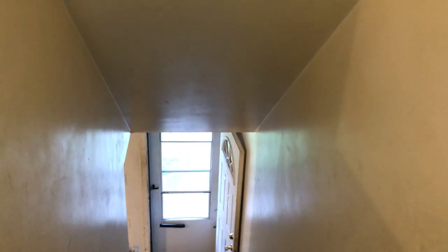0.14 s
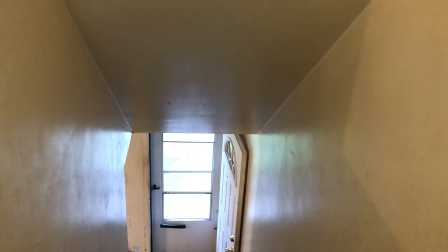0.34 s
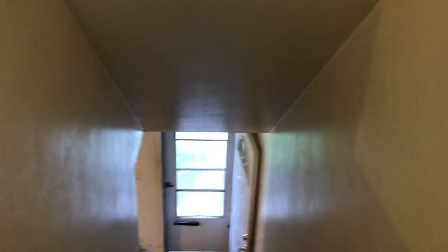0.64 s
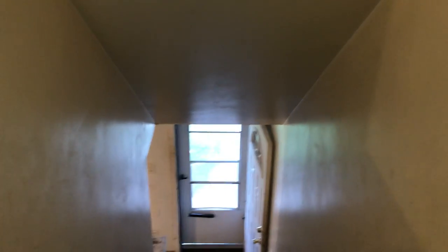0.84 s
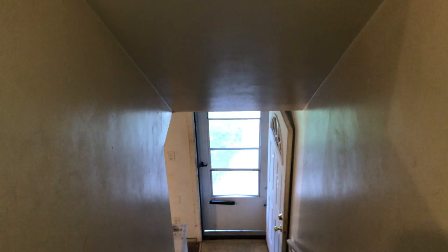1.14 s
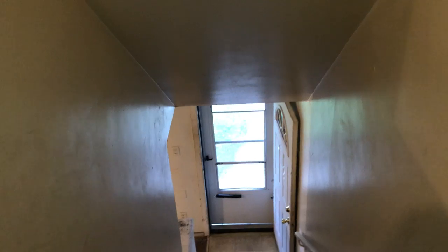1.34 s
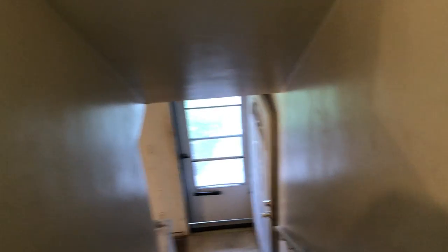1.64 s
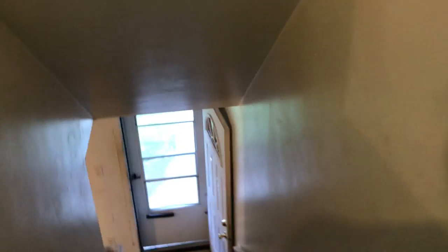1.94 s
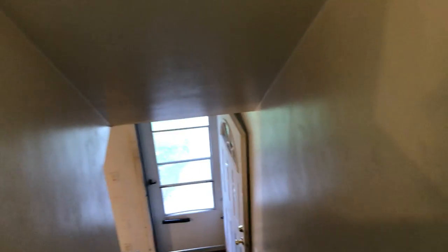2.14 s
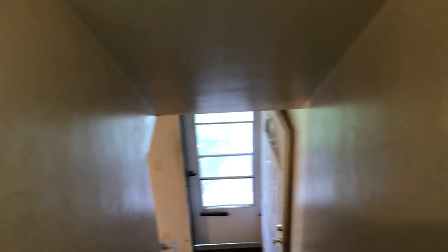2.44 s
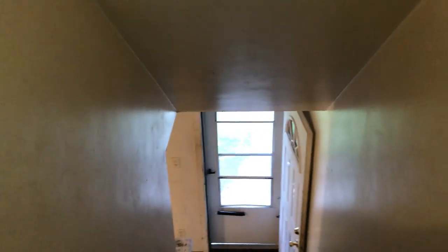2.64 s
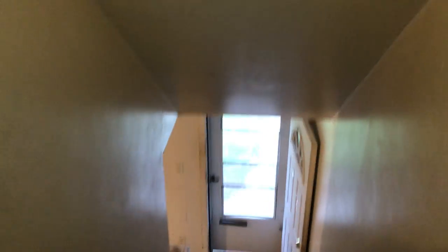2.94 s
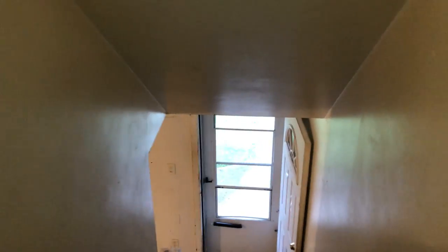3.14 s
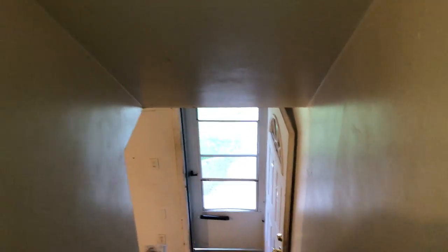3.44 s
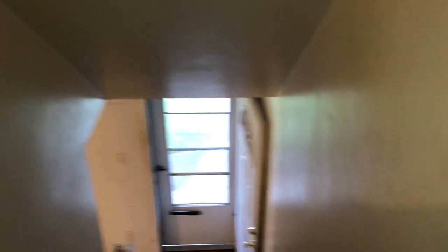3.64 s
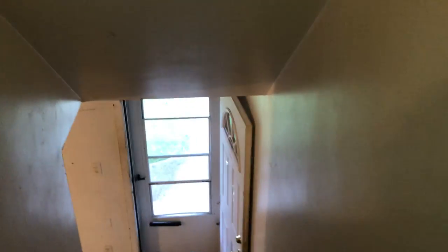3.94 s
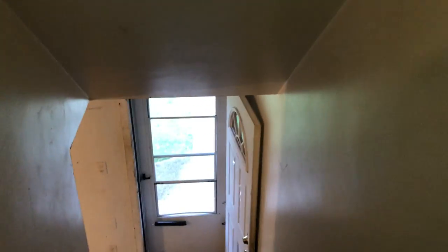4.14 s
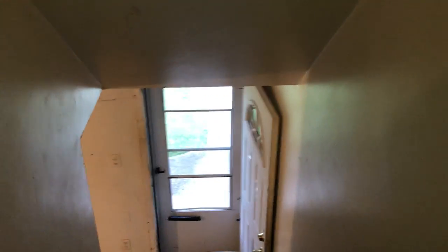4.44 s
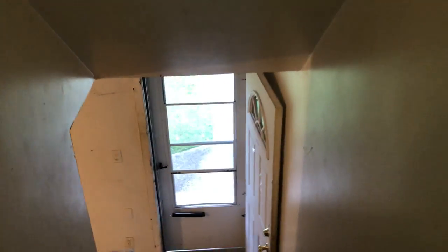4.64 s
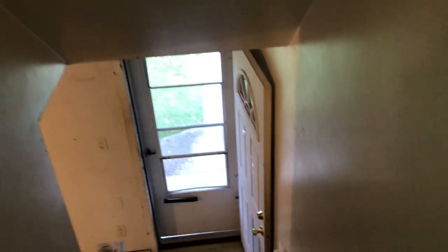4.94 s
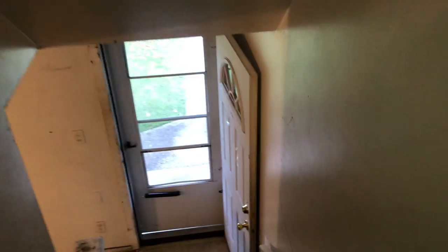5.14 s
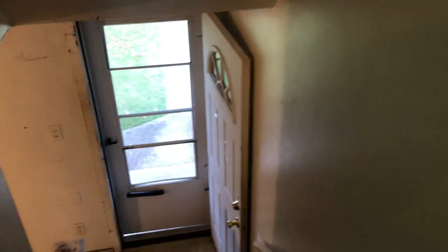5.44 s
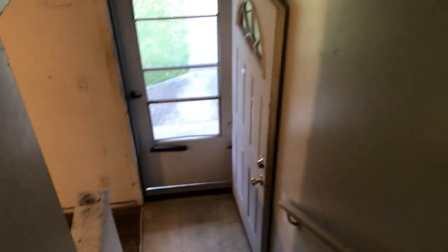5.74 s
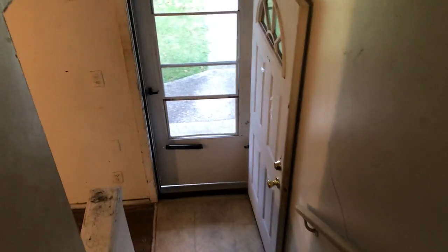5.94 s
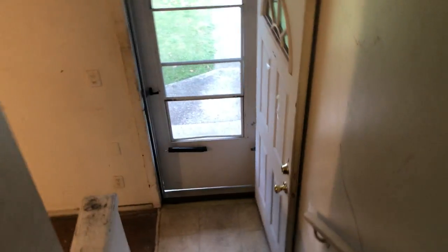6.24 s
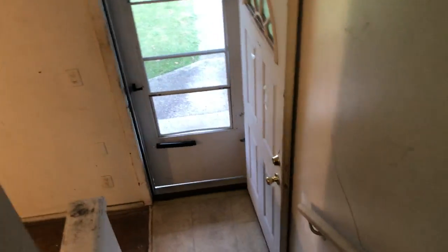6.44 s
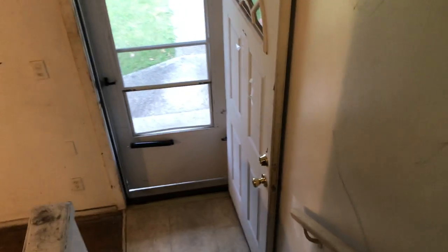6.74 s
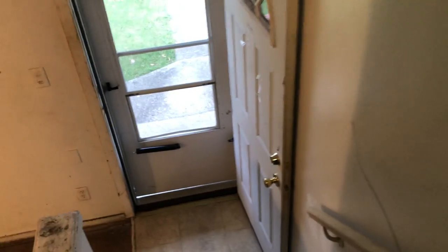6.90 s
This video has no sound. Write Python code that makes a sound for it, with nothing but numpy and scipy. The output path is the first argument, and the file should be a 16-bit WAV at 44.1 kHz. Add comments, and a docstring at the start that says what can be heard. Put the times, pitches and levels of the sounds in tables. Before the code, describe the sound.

Close handheld pickup of slow steps on old stairs indoors: first a little wood tick, then strained creaking that ends in a loud snap. Dull, carpet-softened heel thumps and woody cracks come irregularly, with low frame rumble. Later, skin hisses along a handrail in two or three swells, and a crisp bright click sounds near the microphone. Faint wavering hum underneath; small, dry room with a brief tail.

```python
"""In a bare, narrow stairwell, someone walks slowly down carpeted wooden stairs, holding a phone.
Heels thud as damped low sines; treads slipping on their nails crack as sets of decaying modes.
Loaded wood creaks as filtered showers of tiny slips, and the frame sways as low-band noise.
A hand on the rail hisses as coloured noise; crisp ticks close by are treble bursts with a little tail.
Faint house noise and two wavering drones lie beneath; hard walls return a short, dense tail."""
import sys
import numpy as np
from scipy import signal
from scipy.fft import rfft, irfft
from scipy.io import wavfile
from scipy.ndimage import uniform_filter1d

SR = 44100
rng = np.random.default_rng(int(sys.argv[2]) if len(sys.argv) > 2 else 0)


def generate_wav(signal):
    """Clip the signal to [-1, 1] and save it as 16-bit WAV at the path in sys.argv[1]."""
    frames = np.transpose(np.atleast_2d(signal))
    scaled = np.clip(frames, -1, 1) * 32767
    pcm = np.round(scaled).astype(np.int16)
    wavfile.write(sys.argv[1], SR, pcm)


N = 311762

# Spectrum of the house noise, relative: [f/Hz, level/dB]
HOUSE_SPECTRUM = [(15, -52), (25, -65), (63, 1.5), (113, 6), (144, 3.5), (189, -18.5), (241, -7.5),
                  (291, -12), (402, -18.5), (555, -13.5), (831, -25), (1460, -27), (2190, -59), (3970, -43),
                  (15700, -99)]
HOUSE_DB = -54  # rms about which the level wanders
# Narrow resonances of the low drone: [f/Hz, width/Hz, relative level/dB]
LOW_DRONE_MODES = [(84.7, 25, 0.5), (120.8, 13.2, 4.5)]
# Pitch of the steadier upper drone, which sinks once: [t/s, f/Hz]
UPPER_DRONE_PITCH = [(0, 293.3), (5.9, 293), (6.1, 270), (6.6, 270), (6.75, 293), (7.07, 293)]
# Drone levels: [t/s, low drone level/dB, upper drone level/dB]
DRONE_LEVELS = [(0.0, -60, -62.5), (1.3, -58.5, -64), (1.99, -47.5, -60), (2.15, -50, -75),
                (3.33, -49.5, -74), (3.8, -41, -58), (4.09, -47, -65), (4.55, -48.5, -67),
                (4.78, -51.5, -69), (4.92, -52, -73), (5.12, -54, -87), (5.42, -46, -73), (5.59, -54, -78),
                (5.83, -60, -77), (6.18, -46, -51.5), (6.48, -58.5, -72), (6.77, -45.5, -59),
                (7.07, -50, -68.5)]

# Reverberation: time to fall 60 dB, tail level, corner of its dulling low-pass
WELL_T60_S, WELL_DB, WELL_HZ = 0.17, -13.5, 2150

# Hand on the rail: [t/s, hiss level/dB, duller drag level/dB, top band level/dB]
HAND_LEVELS = [(0.0, -72.5, -66, -78), (0.14, -75, -72, -82), (0.94, -76.5, -73, -82),
               (1.71, -73.5, -70.5, -82), (1.93, -67.5, -63, -78), (2.2, -72.5, -71, -79),
               (2.95, -73.5, -65, -82), (3.09, -74, -60, -80), (3.33, -75.5, -68, -81),
               (3.52, -74.5, -70, -83), (3.76, -67, -63, -73), (4.0, -62, -62.5, -66),
               (4.29, -58, -58, -63), (4.53, -57.5, -58.5, -65), (4.69, -58.5, -56.5, -65),
               (4.78, -75, -64, -79), (5.0, -75, -67.5, -82), (5.28, -71, -63.5, -74),
               (5.42, -63, -60.5, -69), (5.81, -57.5, -57, -66), (6.06, -55.5, -55, -67),
               (6.24, -69.5, -61, -77), (6.52, -73.5, -75, -81), (6.73, -68.5, -62.5, -74),
               (6.87, -66.5, -62.5, -73), (7.07, -61.5, -56, -71)]
# Spectrum of the rubbing, relative: [f/Hz, level/dB per Hz]
RUB_SPECTRUM = [(300, -9), (600, 2.5), (900, -8), (1200, -3.5), (1590, 1.5), (3030, -5.5), (3330, -6),
                (4140, -7), (4970, -11), (5960, -8.5), (7640, -10), (14700, -6), (15700, -12)]

# Crisp ticks and brushes close by, with a little of the stairwell's tail:
# [t/s, peak level/dB, decay length/s, top band level/dB re peak, lower band edge f/Hz]
CLOSE_TICKS = [(0.466, -59.5, 0.014, -9, 5500), (0.504, -53, 0.012, -7, 3000),
               (0.725, -57, 0.0031, -9, 2500), (0.879, -45, 0.005, -25, 850), (1.728, -55, 0.011, -9, 3500),
               (1.796, -57, 0.0072, -15, 3000), (1.819, -36.5, 0.0066, -10, 3440),
               (1.834, -35, 0.0046, -10, 3660), (1.963, -36.5, 0.0064, -2.5, 4000),
               (2.603, -49.5, 0.02, 2, 3000), (2.616, -56, 0.06, -5, 3000), (2.706, -51, 0.004, -14, 1100),
               (2.909, -52, 0.019, -4, 2000), (2.92, -61, 0.2, 3, 6000), (2.991, -55, 0.051, -12, 2500),
               (3.51, -60, 0.0027, -18, 3700), (3.633, -70, 0.0037, -15, 3700),
               (3.747, -59, 0.008, 4, 5000), (4.308, -46.5, 0.072, -12, 7950),
               (5.229, -56.5, 0.01, -4, 3980), (5.265, -60, 0.0066, -10, 3700),
               (6.219, -37, 0.0029, -3, 5040), (6.23, -26.5, 0.0024, -7, 4030),
               (6.617, -52, 0.01, -13, 2800), (6.682, -56, 0.0027, -2, 3700)]

# Weight shifting onto a tread: [t/s, hold time/s, creak level/dB, frame sway level/dB]
TREAD_LOADS = [(0, 0.068, -62, -61.5), (.49, 0.049, -47, -67), (.9, 0.051, -79.5, -59),
               (1.12, 0.17, -56, -58), (1.4, 0.21, -55, -73), (1.73, 0.065, -47, -41),
               (1.84, 0.16, -45, -59), (2.14, 0.026, -73, -50), (2.43, 0.18, -60.5, -67),
               (2.929, 0.16, -48.5, -49.5), (3.22, 0.19, -54, -54), (3.534, 0.16, -45.5, -47),
               (3.75, 0.064, -46.5, -34.5), (3.882, 0.074, -42.5, -43), (4.02, 0.049, -50, -47),
               (4.24, 0.12, -49, -75), (4.53, 0.14, -45.5, -39), (4.66, 0.029, -59, -45),
               (4.85, 0.07, -54.5, -49), (5.232, 0.055, -46, -39), (5.45, 0.051, -52.5, -42.5),
               (5.998, 0.041, -49, -39), (6.08, 0.082, -44.5, -38.5), (6.44, 0.18, -53.5, -47),
               (6.69, 0.027, -48, -33.5), (6.79, 0.078, -49.5, -55)]
# Spectrum of creaking wood, relative: [f/Hz, level/dB per Hz]
CREAK_SPECTRUM = [(88, -92), (150, -10.5), (204, 4.5), (258, -7.5), (295, 3), (451, -7.5), (579, -6),
                  (900, -15), (1150, -15.5), (1930, -24.5), (5000, -34.5), (6500, -37.5), (11000, -120)]
# Rise and fall time constants in s; level at rest in dB
CREAK_RISE_FALL_S, CREAK_REST_DB = (0.0091, 0.12), -68.5
SWAY_RISE_FALL_S, SWAY_REST_DB = (0.0048, 0.08), -59

# Weight landing on a step: [t/s, peak level/dB, f/Hz, envelope scale/cycles]
LANDINGS = [(1.731, -53, 61, 4.2), (1.824, -31.5, 102, 7.3), (2.136, -32, 91.2, 5.9),
            (2.471, -48, 130, 7.9), (2.933, -45, 98, 15), (3.205, -53, 118, 2.7), (3.557, -33.5, 89, 4),
            (3.751, -20, 81.5, 2.5), (3.799, -32, 92.7, 4.2), (4.534, -32.5, 100, 6),
            (4.578, -31.5, 75.3, 4.5), (4.676, -37, 54.7, 1.3), (5.228, -25, 90.4, 6.9),
            (6.057, -55, 80, 6.3), (6.098, -33, 38.4, 3.2), (6.168, -32, 69.4, 1.8),
            (6.44, -42, 107.7, 8.5), (6.678, -27.5, 85.5, 2.9), (6.706, -25.5, 46.6, 3.5),
            (6.847, -38.5, 53, 4.3)]

# Treads slipping on their nails: [t/s, peak level/dB, best excited middle f/Hz, low f/Hz, upper f/Hz,
# low modes level/dB re peak, upper modes level/dB re peak, snap level/dB re peak]
TREAD_CRACKS = [(0.485, -27, 613, 273, 1620, 5, -7, -18), (0.505, -29.5, 894, 250, 1450, -0.5, -20, -11),
                (0.535, -38.5, 590, 304, 1340, 2, -18, -20), (0.557, -54, 895, 254, 1370, 9, -12, -13),
                (1.054, -50, 680, 304, 1730, -8, -5, -4.5), (1.118, -44, 683, 230, 1850, 0, -15, -31),
                (1.17, -45.5, 685, 244, 1890, -4, -14, -30), (1.192, -42, 686, 232, 1850, -4, -10, -29),
                (1.214, -45.5, 680, 192, 1630, 3, -7, -4), (1.248, -45, 694, 286.6, 970, 3.5, -5, -25),
                (1.312, -38.5, 685, 333, 1950, -1.5, -6.5, -22),
                (1.401, -37.5, 690, 332, 1940, -4.5, -7, -20),
                (1.456, -36, 712, 380, 1920, -2.5, -8.5, -18),
                (1.571, -33.5, 713, 376, 1920, -2, -4.5, -21),
                (1.689, -37.5, 692, 384, 1880, -2.5, -6.5, -27), (1.732, -48.5, 600, 308, 2040, -5, 5, 8.5),
                (1.755, -33.5, 678, 393, 1130, -1, -9, -16), (1.796, -32.5, 689, 393, 1066, -2, -18, -19),
                (1.819, -19, 854, 394, 1780, -2, -2, -9), (1.825, -16.5, 530, 255, 1460, -15, -3.5, -15.5),
                (1.836, -22, 693, 400, 1450, -2, -17, -11), (1.851, -36.5, 508, 185, 1160, 4.5, -18, -11),
                (1.881, -39, 611, 300, 1290, -10, -21, -15), (1.922, -44, 830, 413, 2010, 0, 1, -15),
                (1.935, -37.5, 425, 207, 1500, 3, -2.5, -26), (1.967, -34, 940, 380, 1520, -9, -4.5, -19),
                (1.996, -35.5, 620, 253, 1950, -1, -3.5, -4),
                (2.002, -33.5, 656, 378, 1200, -16, -9.5, -10.5),
                (2.042, -36.5, 585, 202, 1560, -1, -4, -8), (2.136, -41.5, 488, 293, 1900, -1, -15, -1),
                (2.432, -40, 634, 377, 1590, -12, -16, -23), (2.512, -52.5, 510, 360, 1640, 6.5, -12, -7),
                (2.934, -38, 555, 296, 1600, -12, -17, -19), (2.988, -38.5, 555, 207, 1560, -14, -4.5, -4),
                (3.01, -36, 517, 220, 1510, -4.5, -13, -2), (3.227, -38.5, 640, 217, 1620, 3.5, -7, -4),
                (3.351, -43.5, 553, 370, 1670, 1, 0, -6), (3.396, -42, 560, 288, 1610, -4, -2.5, -5.5),
                (3.524, -36, 651, 281, 1890, 0.5, -5, -2), (3.554, -36, 710, 297, 1870, 5, -9, -3),
                (3.565, -18.5, 706, 310, 1085, -7, -11, -19), (3.59, -42.5, 830, 306, 1320, 16, -14, -24),
                (3.63, -31.5, 583, 292, 1940, 0, -5.5, -8.5),
                (3.683, -32.5, 436, 281, 1900, -4.5, -13, -11), (3.704, -40, 642, 357, 1930, -9, -1.5, -6),
                (3.747, -43, 420, 220, 1620, 5, -13, -1.5), (3.781, -48, 590, 191, 1700, 2, -13, 3),
                (3.836, -45.5, 592, 294, 1250, -2, -10, -3.5), (3.899, -40.5, 546, 300, 1930, -3, 8.5, -1),
                (3.927, -36.5, 560, 200, 1520, 3.5, -5, -5.5), (3.987, -54, 557, 308, 1610, 2, 3, -1),
                (4.248, -49, 580, 288, 1690, 5.5, -11, -4), (4.268, -41.5, 616, 326, 1570, 6.5, -14, -9),
                (4.312, -46.5, 623, 367, 1620, 3, 6, 9), (4.328, -45.5, 970, 323, 1600, 0, -9, -1),
                (4.473, -50, 590, 302, 1410, 0, 3, -10), (4.524, -40, 656, 240, 1600, -2, -5, -2),
                (4.536, -33.5, 540, 203, 1480, 1.5, -13, -16), (4.563, -39.5, 543, 327, 1470, 10, -28, -25),
                (4.578, -26, 492, 285, 1600, 2, -10, -5.5), (4.596, -33, 810, 280, 1510, 6, -9, -7),
                (4.616, -34, 543, 287, 1190, 4.5, -15, -14), (4.856, -42, 535, 281, 1670, 3.5, -8, -2.5),
                (4.877, -50.5, 526, 303, 1350, 12.5, -19, -10),
                (5.26, -31.5, 626, 185, 1430, -6, -9.5, -5.5), (5.327, -37, 550, 221, 1550, -2.5, -12, -14),
                (5.349, -45, 477, 304, 1350, 6, -15, -9), (5.399, -50, 597, 304, 1550, -6, -19, -22),
                (5.449, -52, 604, 300, 1550, 1, 0, -1), (6.005, -34.5, 605, 234, 1470, -10, -10, -21),
                (6.078, -40, 500, 170, 1650, -7, -10, -10), (6.097, -30, 900, 327, 1610, 7, -5, -5),
                (6.126, -41, 715, 248, 1120, 9.5, -10, -14), (6.145, -29.5, 522, 257, 1520, -3.5, -18, -12),
                (6.175, -46, 820, 314, 1550, -4, 0, 3), (6.23, -32.5, 956, 249, 1075, -15, -3, -15),
                (6.436, -51, 704, 259, 1490, 9, -22, -23), (6.482, -45, 587, 296, 1550, 0, -13, -14),
                (6.681, -34, 707, 334, 1650, 1.5, -11, -13.5), (6.711, -41, 590, 282, 1620, -4, 3.5, -2),
                (6.788, -29, 646, 316, 1470, -1.5, -9, -11), (6.809, -39.5, 830, 215, 1660, 5.5, -13, -4)]
# Modes of a freely ringing tread: [f/Hz, relative level/dB, time to fall 60 dB/s]
TREAD_MODES = [(192.4, -3.5, 0.077), (260, -2.5, 0.068), (305.4, -11.5, 0.095), (365.2, -0.5, 0.054),
               (486, 11, 0.032), (555, 4, 0.049), (600, -2.5, 0.063), (708, -2, 0.067), (866.5, -3, 0.055),
               (927, 4, 0.031), (1053, -0.5, 0.046), (1187, 3.5, 0.034), (1333, -1.5, 0.046),
               (1594, 9.5, 0.019), (1840, 0.5, 0.024), (2002, 6.5, 0.012), (3000, -27, 0.009)]
RING_SHARE, SNAP_S = 0.51, 0.0038  # share of the free ring time left under load; fade of the snap
SLIP_CYCLES, SLIP_HZ = 2.84, 660  # rise in cycles at this pitch; lower modes take longer
AFTER_DB, AFTER_S = -7, 0.0067  # smaller slips that follow: greatest strength at the start, fade
DETUNE_DB_PER_OCT = 60  # modes away from the best excited ones speak less
# Hard slips wake all modes: [crack peak level/dB, most level lost by detuning/dB]
DETUNE_LIMIT = [(-33, 14), (-24, 5)]

# Dips of the microphone port: [f/Hz, Gaussian half-width/Hz, level/dB]
PORT_DIPS = [(4930, 260, -2.5), (10500, 220, -7.5)]
TOP_HZ, CEILING = 15750, .17  # upper band limit; amplitude that rounded peaks approach


def undb(db):
    """Amplitude ratio is ten to the power of level/20."""
    return 10 ** (np.asarray(db) / 20)


def unit(x):
    """Normalisation: division by the rms value gives rms 1."""
    return x / np.sqrt(np.mean(x ** 2))


def curve(table):
    """Linear interpolation turns each table column into one value per sample."""
    s, *columns = np.transpose(table)
    return [np.interp(np.arange(N) / SR, s, c) for c in columns]


def colour(x, points):
    """Spectral shaping: levels are interpolated over log frequency, then rms is set to 1."""
    hz, db = np.transpose(points)
    f = np.maximum(np.arange(N // 2 + 1) * SR / N, 1)
    gain_db = np.interp(np.log(f), np.log(hz), db, left=-120, right=-120)
    return unit(irfft(rfft(x) * undb(gain_db), N))


def band(x, lo_hz, hi_hz):
    """Band-pass filtering retains the components between two frequencies."""
    return signal.sosfilt(signal.butter(2, [lo_hz, hi_hz], "bandpass", fs=SR, output="sos"), x)


def add(out, s, sound, db):
    """Superposition: a sound is scaled to a peak level and summed in at time s."""
    i = int(s * SR)
    out[i:i + len(sound)] += (sound * undb(db) / np.abs(sound).max())[:N - i]


def walk(rate, spread_db):
    """Random wander: held noise, drawn rate times a second, is smoothed twice to the given rms."""
    k = int(SR / rate)
    held = np.repeat(rng.standard_normal(N // k + 1), k)
    smooth = uniform_filter1d(uniform_filter1d(held, k), k)
    return spread_db * unit(smooth[:N])


def grains(rate, spread_db):
    """Random impulse process: clicks of either sign and uneven size, rate of them a second on average."""
    happens, sign, size = rng.random((N, 3)).T
    size_db = np.minimum(-spread_db * np.log(size + 1e-9), 3 * spread_db)
    return (happens < rate / SR) * np.sign(sign - .5) * undb(size_db)


def swells(times, held, levels_db, rest_db, rise_s, fall_s):
    """Exponential rise, hold and decay about each moment add in power to a resting level."""
    t = np.arange(0, N / SR, .002)
    late = t - times[:, None]
    after_hold = np.maximum(late - held[:, None], 0)
    shape = np.exp(np.where(late < 0, late / rise_s, -after_hold / fall_s))
    power = ((undb(levels_db)[:, None] * shape) ** 2).sum(axis=0)
    return np.interp(np.arange(N) / SR, t, np.sqrt(undb(rest_db) ** 2 + power))


def drone(modes):
    """Narrow-band resonance: noise confined to slender bands is heard as a tone that wavers."""
    total = np.zeros(N)
    for hz, width, db in modes:
        total += undb(db) * unit(band(rng.standard_normal(N), hz - width / 2, hz + width / 2))
    return unit(total)


def house():
    """Stationary broadband noise of air and machines, with two drones of changing level."""
    low_db, upper_db = curve(DRONE_LEVELS)
    air = colour(rng.standard_normal(N), HOUSE_SPECTRUM) * undb(HOUSE_DB + walk(7.8, 1))
    upper_hz = curve(UPPER_DRONE_PITCH)[0] + walk(8, 1.37)  # here the wander is in Hz
    upper = unit(np.sin(2 * np.pi * np.cumsum(upper_hz) / SR))
    return air + drone(LOW_DRONE_MODES) * undb(low_db) + upper * undb(upper_db + walk(18, 4.9))


def stairwell(x):
    """Reverberation: hard close walls return a dense decaying tail, treble dying first."""
    t = np.arange(int(.6 * SR)) / SR
    fade = np.exp(-np.log(1000) * t / WELL_T60_S) * (t > .004)
    dull = signal.lfilter(*signal.butter(1, WELL_HZ, fs=SR), rng.standard_normal(len(t))) * fade
    tail = dull + .5 * rng.standard_normal(len(t)) * fade ** 2  # the bright part fades twice as fast
    tail /= np.sqrt(np.sum(tail ** 2))
    return x + undb(WELL_DB) * signal.fftconvolve(x, tail)[:N]


def rail_hand():
    """Sliding friction: skin rubbing along the rail gives noise and small clicks in three bands."""
    hiss_db, drag_db, top_db = curve(HAND_LEVELS)
    rub = colour(rng.standard_normal(N) + .5 * unit(grains(1500, 0.27)), RUB_SPECTRUM)
    flicker_db = walk(25, 1)
    hiss = unit(band(rub, 3030, 10920)) * undb(hiss_db + flicker_db)
    drag = unit(band(rub, 620, 6460)) * undb(drag_db + flicker_db)
    top = unit(band(rub, 8750, TOP_HZ)) * undb(top_db + flicker_db)
    return hiss + drag + top


def ticks():
    """Transient radiation: short treble bursts close to the phone start quickly and soon die."""
    out, t = np.zeros(N), np.arange(int(.2 * SR)) / SR
    for s, db, length, top_db, low_hz in CLOSE_TICKS:
        x = t / max(length, .0005)
        rise = 1 - np.exp(-t / (0.00035 + 0.049 * length))
        burst = rng.standard_normal(len(t)) * rise * np.exp(-2.0 * x - x ** 2)
        summed = np.cumsum(burst)  # tilts the spectrum toward the low edge
        add(out, s, band(band(summed, low_hz, 11100), 0.6 * low_hz, TOP_HZ), db)
        add(out, s, band(burst, 10100, TOP_HZ), db + top_db)
    return out


def frame_sway():
    """Forced low-frequency motion: noise below about 110 Hz swells as weight sways the frame."""
    s, held, _, sway_db = np.transpose(TREAD_LOADS)
    rumble = unit(band(band(rng.standard_normal(N), 34.0, 106.0), 27.0, 110))
    return rumble * swells(s, held, sway_db, SWAY_REST_DB, *SWAY_RISE_FALL_S)


def creaks():
    """Stick-slip friction: dense tiny slips in wood and carpet swell under load."""
    s, held, creak_db, _ = np.transpose(TREAD_LOADS)
    slips = np.abs(grains(600, 1.97))
    envelope = signal.lfilter([1], [1, -np.exp(-1 / (0.0086 * SR))], slips)  # each slip scrapes a few ms
    scrape = colour(envelope * rng.standard_normal(N), CREAK_SPECTRUM)
    return scrape * swells(s, held, creak_db, CREAK_REST_DB, *CREAK_RISE_FALL_S)


def thuds():
    """Damped oscillation: carpet softens each landing into a few slow swings of the stair frame."""
    out, t = np.zeros(N), np.arange(int(.4 * SR)) / SR
    for s, db, hz, cycles in LANDINGS:
        x = t * hz / max(cycles, .5)
        envelope = x * np.exp(-4.0 * x ** 2) + 0.0055 * np.exp(-.6 * x)
        add(out, s, envelope * np.sin(2 * np.pi * hz * t), db)
    return out


def slip_train(length):
    """Impulse excitation: one main slip is followed by eight weaker ones of either sign."""
    slips, (when, size) = np.zeros(length), rng.random((2, 8))
    when = .003 + .045 * when
    slips[(when * SR).astype(int)] = undb(AFTER_DB) * (2 * size - 1) * np.exp(-when / AFTER_S)
    slips[0] = 1
    return slips


def cracks():
    """Modal excitation: each ragged slip rings the tread; its place decides which modes speak."""
    out, t = np.zeros(N), np.arange(int(.2 * SR)) / SR
    hz, mode_db, t60 = (c[:, None] for c in np.transpose(TREAD_MODES))
    low, upper = hz[:, 0] < 420, hz[:, 0] > 1000
    decay = np.exp(-np.log(1000) * t / (t60 * RING_SHARE))
    rise = (1 - np.exp(-t * np.sqrt(hz * SLIP_HZ) / SLIP_CYCLES)) ** 2  # the slip lasts a few cycles
    for s, db, best_hz, low_hz, upper_hz, low_db, upper_db, snap_db in TREAD_CRACKS:
        level_chance, pitch_chance, phase_chance = rng.standard_normal((3, len(TREAD_MODES), 1))
        octaves = np.abs(np.log2(hz / [low_hz, best_hz, upper_hz]))
        nearest = octaves.argmin(axis=0)
        octaves[nearest, range(3)] = 0
        detune_db = DETUNE_DB_PER_OCT * octaves.min(axis=1, keepdims=True)
        lost_db = np.minimum(detune_db, np.interp(db, *np.transpose(DETUNE_LIMIT)))
        weight = undb(mode_db + 1.5 * level_chance - lost_db)
        rung_hz = hz * (1 + .008 * pitch_chance)
        rung_hz[nearest, 0] = low_hz, best_hz, upper_hz  # every tread bends its nearest modes a little
        modes = weight * rise * decay * np.sin(2 * np.pi * rung_hz * t + 1.81 * phase_chance)
        slips = slip_train(len(t) // 4)
        for group, group_db in ((~low & ~upper, 0), (low, low_db), (upper, upper_db)):
            add(out, s, signal.fftconvolve(modes[group].sum(axis=0), slips), db + group_db)
        snap = rng.standard_normal(len(t)) * t * np.exp(-t / SNAP_S)
        add(out, s, band(snap, 790, 3420), db + snap_db)
    return out


def scene():
    """Superposition of direct sounds with those that also excite the stairwell."""
    near_ticks = ticks()
    direct = house() + rail_hand() + near_ticks + frame_sway() + thuds()
    in_well = stairwell(undb(-2.5) * near_ticks + creaks() + cracks())
    return (direct + in_well)[None]


def record(dry):
    """Transducer response: the port dulls two narrow bands, loud peaks round off, the top is cut."""
    f = np.arange(N // 2 + 1) * SR / N
    dips_db = sum(db * np.exp(-((f - hz) / w) ** 2) for hz, w, db in PORT_DIPS)
    x = irfft(rfft(dry) * undb(dips_db), N) / CEILING
    rounded = CEILING * x / (1 + x ** 4) ** .25
    return signal.sosfilt(signal.ellip(10, .2, 60, TOP_HZ, fs=SR, output="sos"), rounded)


dry = scene()
out = record(dry)
generate_wav(out)
```